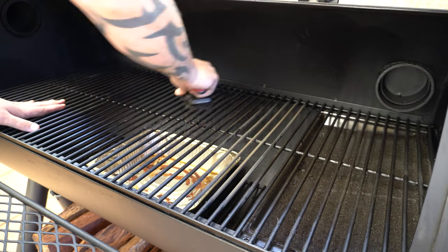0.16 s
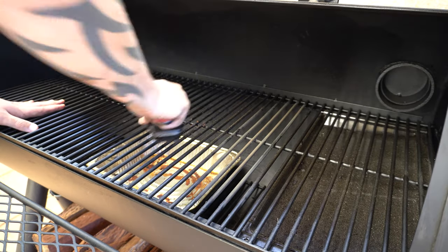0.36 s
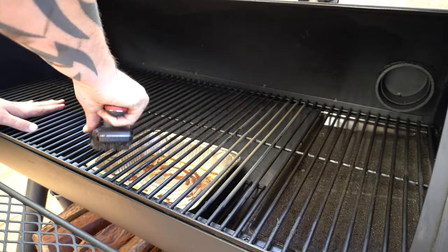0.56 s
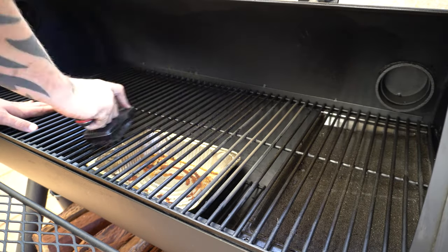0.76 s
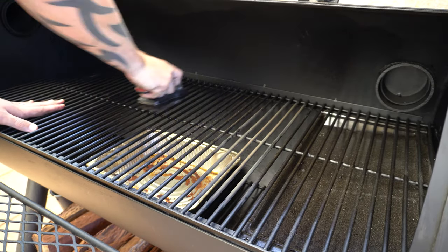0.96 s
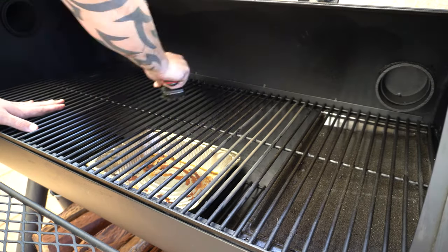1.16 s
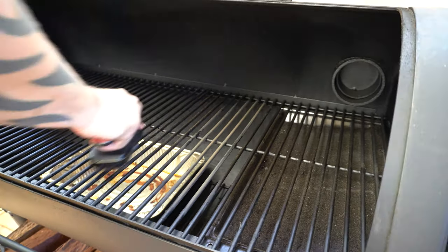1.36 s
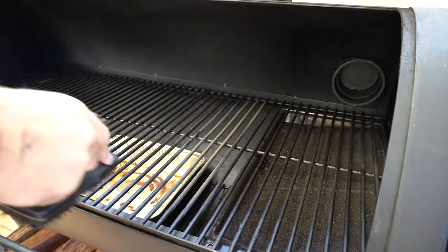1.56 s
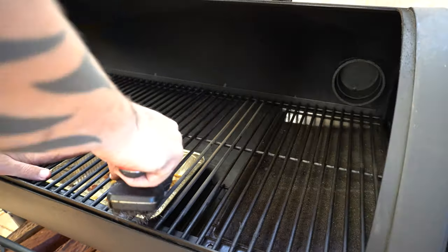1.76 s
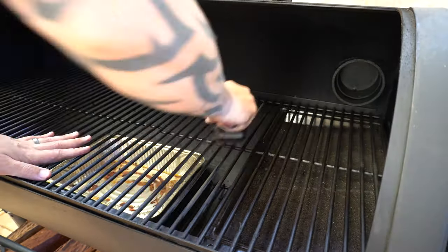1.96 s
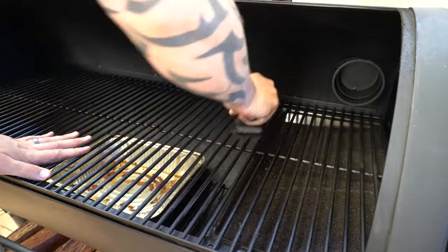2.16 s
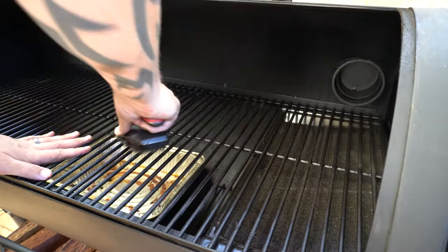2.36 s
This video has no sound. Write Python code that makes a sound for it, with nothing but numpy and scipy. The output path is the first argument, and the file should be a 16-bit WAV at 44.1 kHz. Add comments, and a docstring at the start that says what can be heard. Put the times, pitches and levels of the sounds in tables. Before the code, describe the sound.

A wire brush scrubs a metal grill grate in quick, uneven strokes. The bristles hiss and crackle while the brush head knocks the rods, which clink and ring briefly. It is outdoors, with the microphone close by.

```python
"""Wire brush on a grill grate.

Outdoors, a phone microphone close to the grate. The brush is pushed to and fro: bristle tips crackle in
waves as they drag, and the brush head knocks the rods, which thud, clink and ring briefly.
In the pauses a faint yard hush and a thin high whine come through. Mono, with little bass."""
import sys
import numpy as np
from scipy import signal
from scipy.fft import rfft, irfft
from scipy.io import wavfile
from scipy.ndimage import uniform_filter1d

SR = 44100
rng = np.random.default_rng(int(sys.argv[2]) if len(sys.argv) > 2 else 0)


def to_wav(sig):
    """Store sig (one row per channel, or 1-D mono) as 16-bit WAV at the path in sys.argv[1].

    Samples outside -1..1 are clipped; the rate is SR.
    """
    pcm = np.clip(np.atleast_2d(sig), -1, 1) * 32767
    pcm = np.round(pcm).astype(np.int16)
    wavfile.write(sys.argv[1], SR, pcm.T)  # frames by channels


N = 106722

# Spectra of the bristle hiss, the grate's rattle, a knock's body, a sharp crack and the yard.
# Each row: frequency in Hz, relative level in dB.
BRISTLE_SPECTRUM = [(1760, -76), (3000, -39), (3900, -17), (5500, -7), (7200, -8), (8500, -3), (11600, 0),
                    (15600, -3)]
RATTLE_SPECTRUM = [(400, -35.5), (645, -9.5), (1390, -11), (1930, -18), (2090, -13), (2850, -9.5),
                   (3770, -21), (5000, -18), (6500, -52), (11000, -120)]
BODY_SPECTRUM = [(150, -41), (574, -4), (1410, 6), (1940, -21), (2800, 9.5), (3440, -6), (4210, -0.5),
                 (6000, -23), (7800, -17.5), (13200, -120)]
CRACK_SPECTRUM = [(3000, 1.5), (5000, 10.5), (8000, 9), (12000, 5), (15500, 3.5), (17000, -120)]
YARD_SPECTRUM = [(400, -10), (800, 0), (3000, 0), (4500, -7), (15600, -11)]
# The bristles drag and let go. Each row: start in seconds, length in seconds, hiss level in dB,
# level change along the swish in dB, rattle level in dB.
SWISHES = [(0.0, 0.0069, -46.5, -4, -59.5), (0.016, 0.028, -46.5, 13, -69),
           (0.055, 0.019, -50.5, -5, -65.5), (0.083, 0.078, -47.5, -4, -67), (0.135, 0.0082, -48, 10, -74),
           (0.212, 0.031, -42, -8, -46), (0.256, 0.035, -48.5, 15.5, -61), (0.316, 0.031, -45, -1, -61.5),
           (0.362, 0.03, -47.5, 7, -63.5), (0.431, 0.034, -49.5, -3, -62), (0.485, 0.025, -48, 10, -67),
           (0.535, 0.027, -52.5, 1.5, -66), (0.571, 0.045, -57, 0, -68.5), (0.691, 0.0048, -48, 2, -64.5),
           (0.717, 0.021, -56.5, 3, -64.5), (0.77, 0.014, -55.5, 7, -66.5), (0.8, 0.014, -60, -3, -71),
           (0.826, 0.023, -63.5, 6, -70.5), (0.909, 0.023, -56.5, -10.5, -57.5), (0.933, 0.03, -64, 7, -78),
           (0.965, 0.026, -62, 3, -67.5), (1.015, 0.024, -54, 2.5, -68.5), (1.116, 0.024, -55, 7.5, -62),
           (1.163, 0.02, -52.0, 5, -68), (1.206, 0.028, -55.5, -2, -67), (1.252, 0.014, -54.5, 1.5, -66),
           (1.278, 0.015, -62.5, 4, -75), (1.338, 0.036, -45.0, -3.5, -55.5),
           (1.393, 0.045, -45.5, 11.5, -60), (1.464, 0.034, -49.5, -3, -62),
           (1.518, 0.05, -54.5, -0.5, -67.5), (1.7, 0.047, -46, -14.5, -46.5),
           (1.773, 0.055, -47.5, -13, -48), (1.858, 0.0072, -39.5, 0, -40.5), (1.874, 0.028, -46.5, 4, -59),
           (1.936, 0.022, -39.5, -12.5, -45.5), (1.976, 0.077, -49, -5.5, -59),
           (2.052, 0.066, -55.5, 4.5, -66), (2.153, 0.054, -54, 0.5, -75), (2.214, 0.049, -58, 1, -72.5),
           (2.309, 0.031, -47.5, -14.5, -50.5), (2.349, 0.041, -64.5, 11, -75)]
# Modes of the grate. Each entry: frequency in Hz.
MODE_HZ = [627, 767, 995, 1310, 1463, 1762, 1926, 2186, 2520, 2865, 3000, 3445, 4360]
# The same modes. Each row: relative level in dB, time to die by 60 dB (t60) in seconds.
MODE_LEVEL_DECAY = [(-6.5, 0.21), (-3, 0.41), (-2, 0.25), (-7, 0.042), (-7, .12), (-13, 0.65), (-4.5, 0.58),
                    (-10, 0.21), (-12, 0.11), (-11, 0.039), (-36, 0.23), (-15, 0.66), (-11, 0.1)]
# One mode rings out. Each row: start in seconds, seconds until the brush damps it, level in dB.
RINGS = [(0.012, 0.061, -43), (0.211, 0.13, -25.5), (0.214, 0.078, -50.5), (0.207, 0.021, -40),
         (0.67, 0.037, -57.5), (0.891, 0.061, -50), (1.114, 0.047, -50), (1.43, 0.065, -54.5),
         (1.532, 0.034, -49), (1.693, 0.041, -37), (1.695, 0.044, -62), (1.704, 0.04, -42),
         (1.763, 0.1, -49.5), (1.854, 0.043, -41), (1.862, 0.037, -40), (1.921, 0.14, -41),
         (1.994, 0.034, -49), (2.162, 0.026, -56.5), (2.332, 0.047, -49)]
# Each entry: index of the mode that sounds in that ring.
MODE_OF_RING = [2, 7, 5, 11, 1, 1, 1, 0, 10, 6, 0, 2, 1, 6, 2, 0, 6, 6, 0]
# Rods clear of the bristles ring steadily. Each entry: index of a mode.
UNTOUCHED_MODES = [5, 7, 11]
# The brush head hits the rods. Each row: start in seconds, level in dB, crack against thud in dB,
# thud pitch in Hz, thud t60 in seconds.
KNOCKS = [(0.016, -33.5, 0.5, 2970, 0.077), (0.194, -29.5, -11, 2540, 0.0078),
          (0.213, -21, -3.5, 1870, 0.023), (0.258, -29.5, 4, 2870, 0.072), (0.423, -45, -25, 1255, 0.12),
          (0.474, -39, -24, 944, 0.054), (0.654, -35.5, -11.5, 1240, 0.056), (0.677, -40.5, 3, 2970, 0.035),
          (0.896, -28.5, -8.5, 1180, 0.034), (1.108, -28.5, -5, 1360, 0.069),
          (1.317, -27.5, 3.5, 1420, 0.057), (1.431, -40, -10, 1060, 0.046), (1.684, -29, 1, 1260, 0.048),
          (1.765, -26.5, -4, 1870, 0.084), (1.775, -20, 3.5, 2640, 0.039), (1.847, -24, 1, 1320, 0.03),
          (1.867, -34, 8, 1720, 0.11), (1.932, -24, 0, 2710, 0.023), (1.995, -34.5, -2.5, 1350, 0.095),
          (2.001, -35.5, -2, 1290, 0.072), (2.07, -39, -21, 750, 0.032), (2.148, -46.5, -25, 1320, 0.13),
          (2.216, -43, -30, 810, 0.048), (2.306, -28.5, 1, 1970, 0.058)]
# Strikes on one rod. Each row: start in seconds, peak in dB, pitch in Hz, t60 in seconds.
CLINKS = [(0.017, -30.5, 2900, 0.017), (0.258, -26, 2910, 0.022), (0.654, -38.5, 870, 0.012),
          (0.899, -36.5, 2753, .02), (1.7728, -19.5, 2630, 0.0055), (1.7728, -29.5, 647.4, 0.013),
          (1.9328, -23.5, 2734, 0.0045)]
# Wires and crumbs snap free. Each row: start in seconds, peak in dB, pitch in Hz.
TICKS = [(0.0424, -35, 9100), (0.0806, -44, 11200), (0.0999, -25, 10900), (0.1145, -19.5, 9200),
         (0.1518, -29.5, 11500), (0.3464, -44, 8740), (0.3755, -44, 12300), (0.4568, -33, 9100),
         (0.5017, -36, 11300), (0.803, -43.5, 6000), (0.9047, -34, 4460), (1.04, -31.5, 4340),
         (1.279, -42, 11100)]
# The whine in the background. Each row: frequency in Hz, bandwidth in Hz, level in dB.
WHINE_BANDS = [(6821, 60, -82), (13330, 80, -87)]

TIPS_PER_S, TIP_SPREAD_DB = 16000, 1.5
WIRE_BAND_EDGES_HZ = np.geomspace(2000, 16500, 30)  # groups of wires zing in these bands
DRIFT_DB, DRIFT_PER_S, FLUTTER_DB, FLUTTER_PER_S = 2.5, 45, 2.5, 140
RISE_DB_PER_S, HISS_FALL_DB_PER_S, RATTLE_FALL_DB_PER_S = 1600, 1200, 509
DRAG_RING_DB, PRESSED_T60_S = -9.5, 0.065  # the pressing brush caps the rods' ring time
RING_SWELL_S, DAMPED_T60_S = 0.0037, 0.086
WAVER_DB, CYCLES_PER_WAVER, SLIP_S = 3, 9, 0.00008
KNOCK_ATTACK_S, THUD_RELATIVE_WIDTH, BODY_DB, CRACK_T60_S = 0.0011, 0.28, -4, 0.051
KNOCK_RING_DB, RING_SCATTER_DB, CLINK_SWELL_S = -17.5, 3, 0.00045
TICK_ATTACK_S, TICK_T60_S, TICK_RELATIVE_WIDTH, TICK_CRACK_DB = 0.00033, 0.024, 0.2, -9
YARD_DB, LOW_NOISE_DB, BASS_CUT_HZ, TOP_CUT_HZ = -74, -94, 406, 17000


def undb(db):
    """Gain of a dB value."""
    return 10 ** (np.asarray(db) / 20)


def unit(x):
    """Scaled to rms 1."""
    return x / np.sqrt(np.mean(x ** 2))


def decay(t, t60):
    """Exponential decay, 60 dB in t60 seconds (5 ms at the shortest)."""
    return np.exp(-np.log(1000) * t / max(t60, .005))


def colour(x, spectrum):
    """x shaped by (Hz, dB) points, falling steeply outside them; rms 1."""
    hz, db = np.array(spectrum).T
    log_f = np.log(np.fft.rfftfreq(len(x), 1 / SR) + 1)
    skirt_db = 40 * np.maximum(np.log(hz[0]) - log_f, 0) + 1500 * np.maximum(log_f - np.log(hz[-1]), 0)
    return unit(irfft(rfft(x) * undb(np.interp(log_f, np.log(hz), db) - skirt_db), len(x)))


def resonance(x, hz, width_hz):
    """Two-pole band-pass; rms 1."""
    return unit(signal.lfilter(*signal.iirpeak(hz, hz / width_hz, SR), x))


def wander(per_s):
    """Glides between random values, per_s of them a second; rms 1."""
    hold = int(SR / per_s)
    steps = np.repeat(rng.standard_normal(2000)[:N // hold + 1], hold)[:N]
    return unit(uniform_filter1d(steps, hold))


def pressed_mode(force, hz, t60):
    """A mode of the grate driven by a force, its ring cut short by the pressing brush; rms 1."""
    width_hz = np.log(1000) / (np.pi * min(t60, PRESSED_T60_S))
    return resonance(force, hz, width_hz)


def swish_envelope(t, level_column, fall_db_per_s):
    """All swishes summed in power, each a quick rise, a sloping hold and a fall."""
    power, coarse_t = 0, t[::16]
    for row in SWISHES:
        age, length, change_db = coarse_t - row[0], row[1], row[3]
        slope_db = change_db * (np.clip(age / length, 0, 1) - .5)
        off_db = RISE_DB_PER_S * np.maximum(-age, 0) + fall_db_per_s * np.maximum(age - length, 0)
        power += undb(row[level_column] + slope_db - off_db) ** 2
    return np.interp(t, coarse_t, np.sqrt(power))


def bristle_hiss(t):
    """Close up, dense clicks of dragging wire tips merge into a fluttering hiss of drifting colour."""
    hits = rng.random(N) < TIPS_PER_S / SR
    clicks = hits * rng.standard_normal(N) * undb(TIP_SPREAD_DB * rng.exponential(size=N))
    spectrum = rfft(colour(clicks, BRISTLE_SPECTRUM))
    hz, hiss = np.fft.rfftfreq(N, 1 / SR), 0
    for low, high in zip(WIRE_BAND_EDGES_HZ, WIRE_BAND_EDGES_HZ[1:]):
        band = irfft(spectrum * ((hz >= low) & (hz < high)), N)
        hiss += band * undb(DRIFT_DB * wander(DRIFT_PER_S))
    flutter = undb(FLUTTER_DB * wander(FLUTTER_PER_S))
    return unit(hiss) * flutter * swish_envelope(t, level_column=2, fall_db_per_s=HISS_FALL_DB_PER_S)


def grate_rattle(t):
    """The same dragging rattles the grate and stirs its modes."""
    drag = rng.standard_normal(N) * undb(FLUTTER_DB * wander(FLUTTER_PER_S / 2))
    modes = sum(undb(db) * pressed_mode(drag, hz, t60) for hz, (db, t60) in zip(MODE_HZ, MODE_LEVEL_DECAY))
    rattle = colour(drag, RATTLE_SPECTRUM) + undb(DRAG_RING_DB) * unit(modes)
    return rattle * swish_envelope(t, level_column=4, fall_db_per_s=RATTLE_FALL_DB_PER_S)


def rod_rings(t):
    """Single modes ring until the brush damps them; rubbed ones waver in level and phase."""
    out = 0
    for (start, length, level_db), mode in zip(RINGS, MODE_OF_RING):
        hz, t60 = MODE_HZ[mode], MODE_LEVEL_DECAY[mode][1]
        age, rubbed = np.maximum(t - start, 0), mode not in UNTOUCHED_MODES
        envelope = (1 - np.exp(-age / RING_SWELL_S)) * decay(age, t60)
        damping = decay(np.maximum(age - length, 0), DAMPED_T60_S)
        slip = rubbed * SLIP_S * wander(hz / CYCLES_PER_WAVER)
        tone = np.sin(2 * np.pi * (hz * (t + slip) + rng.random()))
        waver_db = rubbed * WAVER_DB * wander(hz / CYCLES_PER_WAVER)
        out += undb(level_db + waver_db) * envelope * damping * tone
    return out


def head_knocks():
    """The brush head hits the rods: a hollow thud, a short crack, and a jolt that rings every mode."""
    t = np.arange(8192) / SR
    out = np.zeros(N + len(t))
    rise, fade = 1 - np.exp(-t / KNOCK_ATTACK_S), np.hanning(2 * len(t))[len(t):]
    for start, level_db, crack_db, hz, thud_t60 in KNOCKS:
        noise = rng.standard_normal((4, len(t)))
        jolt, width_hz = rise * decay(t, thud_t60), THUD_RELATIVE_WIDTH * hz
        hollow = resonance(resonance(noise[0], hz, width_hz), hz, width_hz)
        thud = (hollow + undb(BODY_DB) * colour(noise[1], BODY_SPECTRUM)) * jolt
        crack = undb(crack_db) * colour(noise[2], CRACK_SPECTRUM) * rise * decay(t, CRACK_T60_S)
        knock = .5 * (thud + crack)
        for mode_hz, (mode_db, t60) in zip(MODE_HZ, MODE_LEVEL_DECAY):
            ring = pressed_mode(noise[3] * jolt, mode_hz, t60)
            ring_db = KNOCK_RING_DB + mode_db + RING_SCATTER_DB * rng.standard_normal()
            knock += undb(ring_db) * ring / np.abs(ring).max()
        out[int(start * SR):][:len(t)] += undb(level_db) * knock * fade
    return out[:N]


def rod_clinks(t):
    """A hard point of the brush strikes one rod: a clean tone that swells and dies at once."""
    out = 0
    for start, peak_db, hz, t60 in CLINKS:
        age = np.maximum(t - start, 0)
        envelope = (1 - np.exp(-age / CLINK_SWELL_S)) ** 2 * decay(age, t60)
        tone = np.sin(2 * np.pi * (hz * t + rng.random()))
        out += undb(peak_db) * envelope / envelope.max() * tone
    return out


def wire_ticks():
    """Single wires and crumbs snap free: a few milliseconds of bright noise around a pitch."""
    t = np.arange(4096) / SR
    out = np.zeros(N + len(t))
    envelope = (1 - np.exp(-t / TICK_ATTACK_S)) * decay(t, TICK_T60_S)
    for start, peak_db, hz in TICKS:
        noise = rng.standard_normal(len(t))
        zing = resonance(noise, hz, TICK_RELATIVE_WIDTH * hz)
        tick = (zing + undb(TICK_CRACK_DB) * colour(noise, CRACK_SPECTRUM)) * envelope
        out[int(start * SR):][:len(t)] += undb(peak_db) * tick / np.abs(tick).max()
    return out[:N]


def yard():
    """Behind the grill, a faint steady hush and a thin high whine, heard in the pauses."""
    hush = undb(YARD_DB) * colour(rng.standard_normal(N), YARD_SPECTRUM)
    whine = sum(undb(db) * resonance(rng.standard_normal(N), hz, width) for hz, width, db in WHINE_BANDS)
    return hush + whine


def scene():
    """What reaches the microphone: brush and grate up close, the yard behind, in mono."""
    t = np.arange(N) / SR
    grill = bristle_hiss(t) + grate_rattle(t) + rod_rings(t) + head_knocks() + rod_clinks(t) + wire_ticks()
    return (grill + yard())[None]


def record(dry):
    """The sound is left with little bass, a trace of low noise and nothing above 17 kHz."""
    bass_cut = signal.butter(N=5, Wn=BASS_CUT_HZ, btype="high", fs=SR, output="sos")
    top_cut = signal.ellip(8, .2, 70, TOP_CUT_HZ, fs=SR, output="sos")
    low_noise = undb(LOW_NOISE_DB) * colour(rng.standard_normal(N), [(20, 1.5), (150, 1), (500, 0.0)])
    return signal.sosfilt(top_cut, signal.sosfilt(bass_cut, dry) + low_noise)


dry = scene()
out = record(dry)
to_wav(out)
```